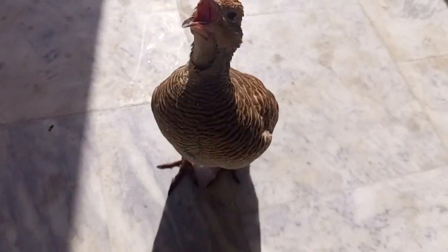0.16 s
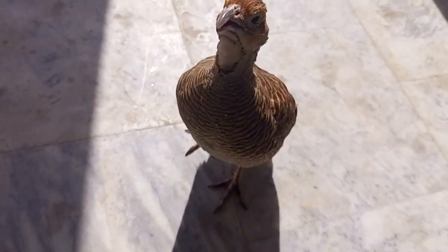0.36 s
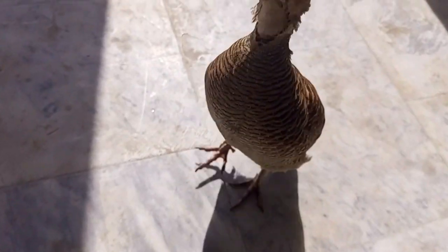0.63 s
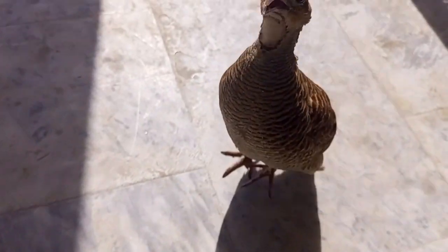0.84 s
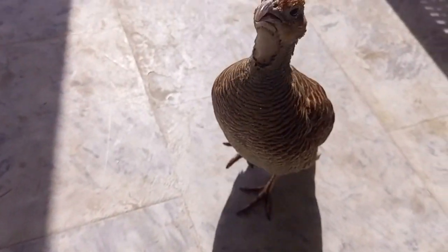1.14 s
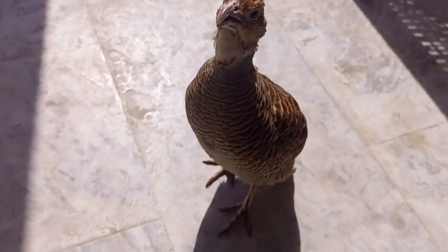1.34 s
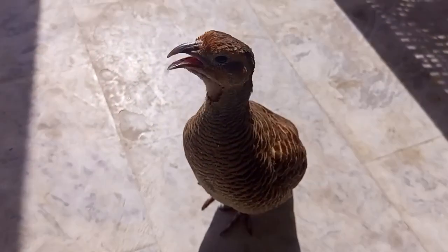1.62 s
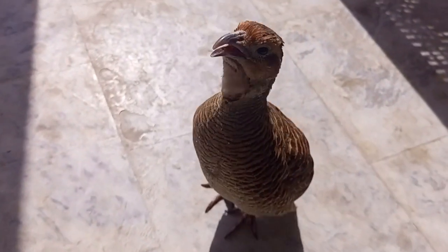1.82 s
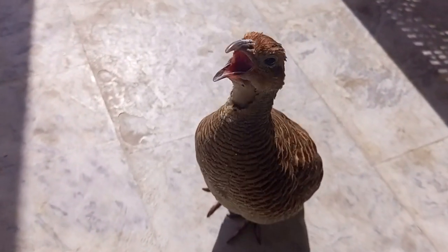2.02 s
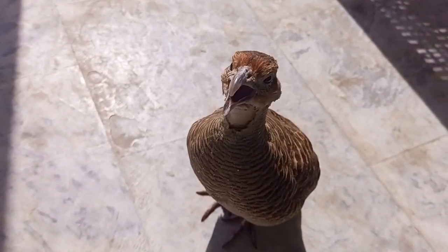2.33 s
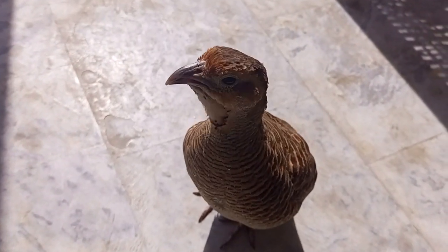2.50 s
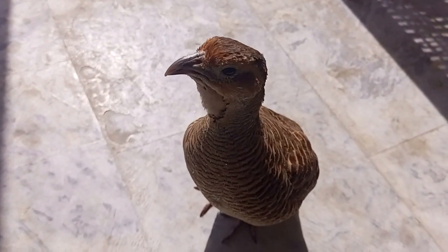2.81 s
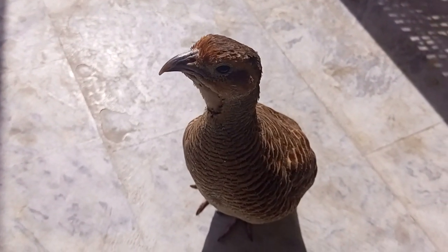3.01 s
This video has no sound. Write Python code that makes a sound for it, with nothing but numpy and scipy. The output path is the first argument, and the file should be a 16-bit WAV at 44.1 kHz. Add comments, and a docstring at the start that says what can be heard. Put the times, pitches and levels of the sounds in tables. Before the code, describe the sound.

Partridge at arm's length giving hoarse, sharply whistling calls and quick clucks in an echoing stone-floored yard.

```python
"""A partridge-like bird calls at arm's length in a stone-floored, echoing yard: long three-part calls and clucks.
Its voice flips between a hoarse low register and a clear one an octave up, built from partials and breath noise.
Decaying noise makes the yard's echo, which smears every note; a claw taps the stone with a few short ringing modes.
Noise makes the quiet air and a puff at the microphone, and a sine makes a faint early tone.
Bird and yard are switched on in the echo of an earlier cluck; a suppressor turns quiet bands further down."""
import sys
import numpy as np
from scipy import signal
from scipy.fft import rfft, irfft, next_fast_len
from scipy.io import wavfile
from scipy.ndimage import uniform_filter1d

SR = 44100
rng = np.random.default_rng(int(sys.argv[2]) if len(sys.argv) > 2 else 0)


def to_linear_factor(level_db):
    """Convert decibel levels (scalar or array-like) to linear amplitude factors."""
    exponent = np.asarray(level_db, float) / 20
    return 10 ** exponent


def dump(signal):
    """Clip the signal to [-1, 1] and save it as 16-bit WAV at the path in sys.argv[1]."""
    limited = np.clip(np.atleast_2d(signal).T, -1, 1)
    pcm = np.round(limited * 32767).astype(np.int16)
    wavfile.write(sys.argv[1], SR, pcm)


N = 138915  # samples in the whole scene
CUTOFF_HZ = 16500  # the voice has no partials above this


def at_hz(points, hz):
    """Read a table of frequencies and values, in between its rows on a log frequency axis."""
    table_hz, values = np.array(points).T
    return np.interp(np.log(hz), np.log(table_hz), values)


def coloured(x, points):
    """Filter a sound by a table of frequencies and levels in dB."""
    size = next_fast_len(len(x) + 2048)
    hz = np.fft.rfftfreq(size, 1 / SR) + 1  # one added to avoid the log of zero
    return irfft(rfft(x, size) * to_linear_factor(at_hz(points, hz)), size)[:len(x)]


def wobble(count, hz):
    """Random wandering: noise low-passed at hz and scaled to a spread of 1."""
    noise = rng.standard_normal(SR // 4)
    slow = signal.lfilter(*signal.butter(2, hz, fs=SR), noise)[800:]  # skip the filter's start
    return slow[:count] / slow.std()


def add(out, start_s, x):
    """Mix x into out at a time in seconds."""
    i = int(start_s * SR)
    out[i:i + len(x)] += x[:N - i]


def bump(length_s):
    """A smooth swell from silence and back."""
    return np.hanning(int(length_s * SR))


# How strong the air is at each pitch. Each row: frequency in Hz, relative density in dB per Hz.
AIR_SPECTRUM = [(20, -6), (60, -0.5), (110, -5), (200, -7.5), (400, -18), (1000, -13), (2500, -1),
                (4000, -12), (9000, -26.5), (16000, -46.5)]


def quiet_air():
    """Steady noise with the colour of quiet air, set to one overall level."""
    level_db = -64.5
    air = coloured(rng.standard_normal(N), AIR_SPECTRUM)
    return to_linear_factor(level_db) * air / air.std()


def faint_tone():
    """A low sine swells and fades before the bird is switched on."""
    start_s, length_s, level_db, pitch_hz = 0.016, 0.077, -63.5, 528
    out, swell = np.zeros(N), bump(length_s)
    t = np.arange(len(swell)) / SR
    add(out, start_s, to_linear_factor(level_db) * swell * np.sin(2 * np.pi * pitch_hz * t))
    return out


def placed(shape, start, stretch=1, db=0, ratio=1, rough=0):
    """Move and stretch a shared voice part in time, and shift its level, pitch and hoarseness."""
    return np.array(shape) * [stretch, ratio, 1, 1, 1] + [start, 0, db, 0, rough]


# Throat, beak and microphone in the hoarse register. Each row: frequency in Hz, level in dB.
HOARSE_THROAT = [(300, -76), (500, -21), (1100, -11), (1600, -11), (2400, -4.5), (3600, -4), (4500, -5.5),
                 (5600, 6.5), (6600, -4.5), (8000, -19), (11000, -23.5), (13000, -41.5), (15300, -21),
                 (17000, -67.5)]
# The same in the clear register. Each row: frequency in Hz, level in dB.
CLEAR_THROAT = [(400, -38), (1000, 7.5), (1500, 5.5), (2200, -2), (3200, -19), (4400, -5), (5500, 2.5),
                (6600, -8.5), (8800, -14), (11000, -21.5), (13200, -27), (15300, -23.5), (17000, -24.5)]


def voice(parts, hz, db, hoarse=HOARSE_THROAT, clear=CLEAR_THROAT, tilt_db=None):
    """Partials of a wavering pitch pass the throat; breath noise swells once in every cycle.

    Fading the odd partials leaves the even ones, so the voice flips up an octave."""
    jitter, shimmer_db = 0.036, 7.0  # pitch and level wobble at full hoarseness
    # The beak closes as pitch sinks under open_hz: dB lost per octave of pitch and octave above dull_from_hz.
    open_hz, dull_from_hz, dull_db = 1166, 985, 11
    top_from_hz, top_dull = 6170, 2.85  # above this, the treble tilt has an extra slope this many times as steep
    breath_low_hz, breath_gain = 1300, 2.28

    s, *columns = np.vstack(parts).T
    t = s[0] + np.arange(int((s[-1] - s[0]) * SR)) / SR
    times = np.maximum.accumulate(s)  # time never runs backwards where parts overlap
    ratio, level_db, odd_db, rough = [np.interp(t, times, c) for c in columns]
    rough = np.clip(rough, 0, 1)
    pitch = hz * ratio * (1 + jitter * rough * wobble(len(t), hz=300))
    phase = 2 * np.pi * (np.cumsum(pitch) / SR + rng.random())

    k = np.arange(1, 33)[:, None]  # partial numbers
    partial_hz = k * pitch
    low = to_linear_factor(np.minimum(odd_db, 0))  # share of the low register
    if tilt_db is None:
        tilt_db = -dull_db * np.maximum(np.log2(open_hz / (hz * ratio)), 0)
    low_colour = low * to_linear_factor(at_hz(hoarse, partial_hz))
    clear_colour = (1 - low) * (k % 2 == 0) * to_linear_factor(at_hz(clear, partial_hz))
    octaves = np.maximum(np.log2(partial_hz / dull_from_hz), 0)
    top_octaves = np.maximum(np.log2(partial_hz / top_from_hz), 0)
    colour = (low_colour + clear_colour) * to_linear_factor(tilt_db * (octaves + top_dull * top_octaves))
    waves = np.cos(k * phase + 0.288 * k ** 2)  # staggered phases
    tone = np.sum(colour * (partial_hz < CUTOFF_HZ) * waves, axis=0)

    gated = rng.standard_normal(SR // 4)[:len(t)] * (1 + np.cos(phase))
    breath = coloured(gated, hoarse) * to_linear_factor(0.7 * tilt_db)
    breath = signal.lfilter(*signal.butter(2, breath_low_hz, "high", fs=SR), breath)

    shimmer = shimmer_db * rough * np.tanh(wobble(len(t), hz=256))
    mixed = (1 - rough) * tone + breath_gain * rough * breath
    return s[0], to_linear_factor(db + level_db + shimmer) * mixed


# When the bird clucks. Each row: start in seconds, upward flip in seconds, rise level in dB,
# fall level in dB, reference pitch in Hz (the pitch at the flip).
CLUCK_TIMES = [(0.047, 0.088, -17.5, -16.5, 951.6), (0.844, 0.88, -21.5, -11.5, 1060),
               (1.254, 1.297, -22.5, -11, 1054), (1.379, 1.411, -21, -12.5, 996.6),
               (1.494, 1.521, -22, -14, 923.3), (2.396, 2.428, -20.5, -13, 1023),
               (2.51, 2.538, -19.5, -13.5, 956.8), (2.621, 2.649, -22.5, -17.5, 980)]
# The cluck before the flip. Each row: share of the rise's length, pitch ratio, level in dB,
# odd partials in dB (above 0 counts as 0), hoarseness from 0 to 1.
CLUCK_RISE = [(0, 0.474, -32, -24, 0), (.12, .6, -6, -2, 0), (.45, .88, 1.5, 3, 0.22),
              (.8, 1.0, 1, 0, 0.44), (.97, 1.03, 1, 3, 0.47)]
# The cluck after the flip. Each row: seconds from the flip, pitch ratio, level in dB,
# odd partials in dB (above 0 counts as 0), hoarseness from 0 to 1.
CLUCK_FALL = [(0, 1.0, -1.5, -15, 0.5), (.003, 0.98, 2.5, -35.5, 0.04), (.012, .88, -1, -23.5, 0.15),
              (.021, .76, -2.5, -13.5, 0.09), (.028, .68, -9.5, -8.5, .1), (.034, 0.2, -52, -5, .1)]


def clucks():
    """The low register rises in pitch, flips up an octave and falls; a weak fall is hoarser."""
    full_fall_db, hoarser_per_db = -16, 0.12
    out = np.zeros(N)
    for start, flip, rise_db, fall_db, hz in CLUCK_TIMES:
        hoarser = hoarser_per_db * max(full_fall_db - fall_db, 0)
        rise = placed(CLUCK_RISE, start, flip - start, rise_db)
        fall = placed(CLUCK_FALL, flip, db=fall_db, rough=hoarser)
        add(out, *voice([rise, fall], hz, 0))
    return out


# How long the echo lasts. Each row: frequency in Hz, time to fade by 60 dB in seconds.
ECHO_FADE = [(400, 0.23), (1000, 0.54), (2000, 0.71), (4000, 0.91), (6000, 0.49), (8000, 0.36),
             (12000, .32), (16000, 0.34)]
# How strong the echo's noise is. Each row: frequency in Hz, gain in dB.
ECHO_GAIN = [(400, 2.5), (1000, -10.5), (2000, 3), (4000, -8.5), (6000, -7), (10000, -1.5), (16000, -7.5)]


def yard(x):
    """A floor echo, then dense wall echoes: noise that dies away band by band."""
    onset_s, floor_echo_s, floor_echo_db = 0.015, 0.0021, -20.5
    t = np.arange(SR) / SR
    edges = 250 * 2 ** np.arange(0, 6.3, 0.5)  # half-octave bands
    white, tail = rng.standard_normal((2, SR)), 0
    for k, (low, high) in enumerate(zip(edges, edges[1:])):
        bandpass = signal.butter(2, [low, high], "band", fs=SR, output="sos")
        band = signal.sosfilt(bandpass, white[k % 2])  # neighbouring bands use different noise
        middle_hz = np.sqrt(low * high)
        fade_db = at_hz(ECHO_GAIN, middle_hz) - 60 * t / at_hz(ECHO_FADE, middle_hz)
        tail = tail + band * to_linear_factor(fade_db)
    build_up = 1 - np.exp(-(t / onset_s) ** 2)
    tail = tail * build_up / np.sqrt(0.043 * SR)
    tail[int(floor_echo_s * SR)] += to_linear_factor(floor_echo_db)
    return signal.fftconvolve(x, tail)[:N]


# When the weak clucks come. Each row: start in seconds, length in seconds, level in dB,
# top pitch in Hz, treble tilt in dB per octave.
MUTTER_TIMES = [(0.168, 0.038, -20, 451, -0.5), (1.612, 0.048, -17.5, 505, -3),
                (2.734, .05, -13.5, 456.7, -6.5), (2.862, 0.044, -14.5, 545, -9.5)]
# The course of a weak cluck. Each row: share of its length, pitch ratio, level in dB,
# odd partials in dB, hoarseness from 0 to 1.
MUTTER_SHAPE = [(0, .55, -30, -12, .03), (.12, .64, -8, -12, .04), (.35, .82, -5, -10, .1),
                (.58, .96, -2, -4, .22), (.75, 1.0, 0, -2, .25), (.88, .96, -3, -2, .25),
                (1.0, .88, -34, -2, .2)]
# Throat, beak and microphone for weak clucks. Each row: frequency in Hz, level in dB.
MUTTER_THROAT = [(300, -32), (500, -21), (1000, -11), (1300, -3), (1600, 0), (2000, -6), (2800, -18),
                 (4000, -21), (5600, -10), (7000, -17), (10000, -28), (17000, -45)]


def mutters():
    """Weak clucks stay an octave down, with one throat colour for all their partials."""
    out = np.zeros(N)
    for start, length, db, hz, tilt_db in MUTTER_TIMES:
        parts = [placed(MUTTER_SHAPE, start, length)]
        add(out, *voice(parts, hz, db, MUTTER_THROAT, MUTTER_THROAT, tilt_db))
    return out


# When the long calls come. Each row: start in seconds, flat note in seconds, falling whistle in seconds,
# level in dB, pitch ratio of the opening.
LONG_CALL_TIMES = [(0.255, 0.294, 0.34, -13.5, 1.016), (0.586, 0.631, .672, -13, 1.026),
                   (0.991, 1.04, 1.081, -13.5, 1.07), (1.746, 1.789, 1.836, -13, .9),
                   (2.139, 2.179, 2.222, -12, 1.042)]
# The three parts of a long call, in order. Each row: seconds from the part's start before stretching,
# pitch ratio, level in dB, odd partials in dB (above 0 counts as 0), hoarseness from 0 to 1.
CALL_OPENING = [(0, .95, -22.5, 0, .3), (.0015, 1.0, -17, 0, .25), (.007, 1.13, -6, 0, .25),
                (.015, 1.05, -4, 0, .3), (.02, .98, -7, 5, .6), (.027, 1.0, -8, -3.5, .25),
                (.036, 1.0, -7, -8.5, 0.31), (.039, .98, 1, -3.5, .6), (.043, 1.0, -8, -12, .5)]
CALL_NOTE = [(0, 1.0, -12, -19.5, 0.081), (.003, 1.02, 1, -39, .03), (.014, 1.01, 4, -45, 0.024),
             (.018, .95, 1.5, -15.5, 0.075), (.021, .85, -27, 19.5, .4), (.026, .99, -7.5, 0.5, 0.63),
             (.034, .97, -22, -8, .4), (.038, .97, -16, -9.5, 0.54)]
CALL_WHISTLE = [(0, .99, -10, -11.5, 0.17), (.002, 1.0, 2, -17.5, .04), (.016, .99, 0, -24.5, .04),
                (.027, .955, 3, -22, .05), (.04, .87, 0.5, -32.5, 0.021), (.052, .76, -5, -19.5, .05),
                (.058, .7, -22, 1.5, .1), (.064, .62, -25.5, -13, .1)]


def long_calls():
    """Hoarse opening, flat note and falling whistle are strung together in one breath."""
    pitch_hz = 1089.6  # low-register pitch
    opening_s, note_s = 0.044, 0.04  # lengths before stretching
    out = np.zeros(N)
    for start, note, whistle, db, ratio in LONG_CALL_TIMES:
        parts = [placed(CALL_OPENING, start, (note - start) / opening_s, ratio=ratio),
                 placed(CALL_NOTE, note, (whistle - note) / note_s),
                 placed(CALL_WHISTLE, whistle)]
        add(out, *voice(parts, pitch_hz, db))
    return out


# How the tapped stone rings. Each row: frequency in Hz, level in dB, time to fade by 60 dB in seconds.
CLAW_MODES = [(360, -1.5, 0.037), (705, -3.5, 0.072), (1300, 7, 0.01), (3174, 0.5, 0.045),
              (6000, -11.5, .01)]


def claw():
    """A claw taps the stone: a few short modes ring over a brief scrape of noise."""
    tap_s, level_db = 2.067, -45.5
    scrape_s, scrape_db = 0.012, -5  # scrape length; its level against the tap
    out, t = np.zeros(N), np.arange(SR // 10) / SR
    ring = sum(to_linear_factor(level_db + db - 60 * t / t60) * np.sin(2 * np.pi * hz * t) for hz, db, t60 in CLAW_MODES)
    add(out, tap_s, ring)
    scrape = bump(scrape_s)
    scrape = to_linear_factor(level_db + scrape_db) * scrape * wobble(len(scrape), hz=7000)
    add(out, tap_s - scrape_s / 4, scrape)
    return out


def puff():
    """Air stirs at the microphone: a short swell of low-passed noise."""
    start_s, length_s, level_db, lowpass_hz = 2.175, 0.062, -58.5, 130
    out, swell = np.zeros(N), bump(length_s)
    add(out, start_s, to_linear_factor(level_db) * swell * wobble(len(swell), hz=lowpass_hz))
    return out


def scene():
    """Bird and claw in the yard, switched on and thinned in the bass by the microphone, over the surroundings."""
    on_s, fade_in_s, mic_low_hz = 0.1085, 0.00026, 350
    sink_s, sink_db_per_s = 2.706, -44.5  # the level sinks towards the end
    t = np.arange(N) / SR
    near = clucks() + mutters() + long_calls() + claw()
    switch = np.clip((t - on_s) / fade_in_s, 0, 1)
    sink = to_linear_factor(sink_db_per_s * np.maximum(t - sink_s, 0))
    switched = (near + yard(near)) * switch * sink
    bass_cut = signal.butter(4, mic_low_hz, "high", fs=SR, output="sos")
    surroundings = quiet_air() + faint_tone() + puff()
    return (signal.sosfilt(bass_cut, switched) + surroundings)[None]


# Where the suppressor starts to turn a band down. Each row: frequency in Hz, knee level in dB.
SUPPRESSOR_KNEE = [(300, -64), (1000, -72.5), (1700, -62.5), (2500, -56), (3500, -50), (6000, -53.5),
                   (9000, -72), (16000, -74)]


def suppressor(x):
    """Follow the level band by band, rising at once and falling slowly, and lower what is under the knee."""
    slope, depth_db, follow_s = 0.54, -15, 0.028  # extra dB lost per dB under the knee; lowest gain; release
    hz, _, z = signal.stft(x, SR, nperseg=512, noverlap=384)
    r = np.exp(-128 / (follow_s * SR))  # 128 samples per step
    power = uniform_filter1d(np.abs(z) ** 2, size=7, axis=0)  # average over neighbouring bands
    power = np.maximum(power, signal.lfilter([1 - r], [1, -r], power))
    over_db = 10 * np.log10(power + 1e-16) - at_hz(SUPPRESSOR_KNEE, hz + 1)[:, None]
    gain_db = np.clip(slope * over_db, depth_db, 0)
    return signal.istft(z * to_linear_factor(gain_db), SR, nperseg=512, noverlap=384)[1][None, :N]


def band_limit(x):
    """A steep low-pass at the top of the band."""
    return signal.sosfilt(signal.butter(12, 16820, fs=SR, output="sos"), x)


def record(dry):
    """Turn quiet bands down, then cut the highest treble steeply."""
    quieted = suppressor(dry[0])
    treble_cut = signal.cheby2(10, 60, CUTOFF_HZ + 500, fs=SR, output="sos")  # 60 dB down from 17 kHz
    finished = signal.sosfilt(treble_cut, quieted)
    return band_limit(finished)


dry = scene()
out = record(dry)
dump(out)
```